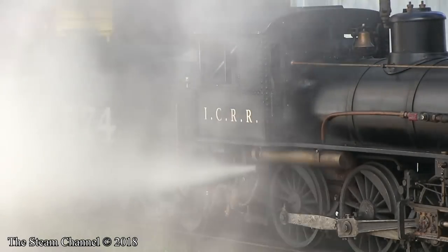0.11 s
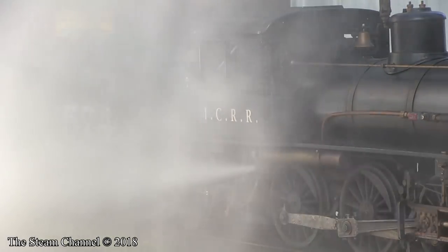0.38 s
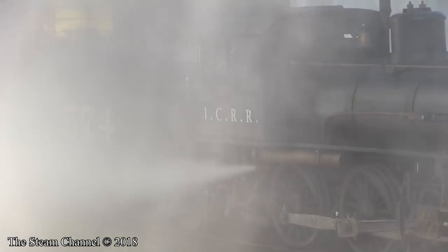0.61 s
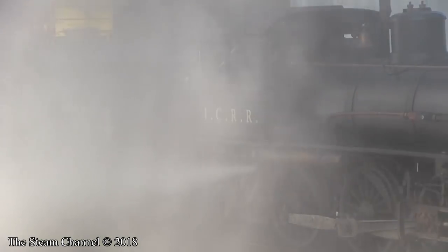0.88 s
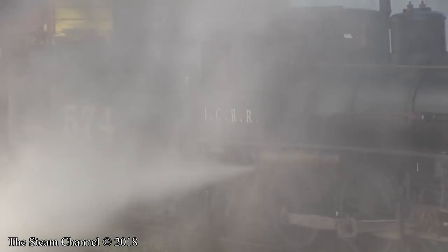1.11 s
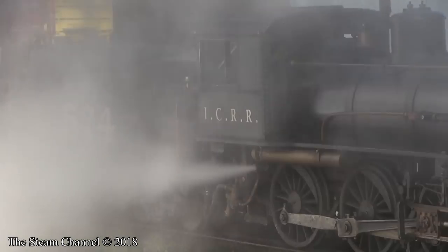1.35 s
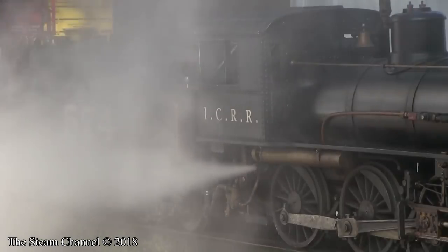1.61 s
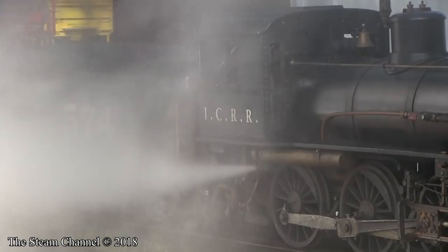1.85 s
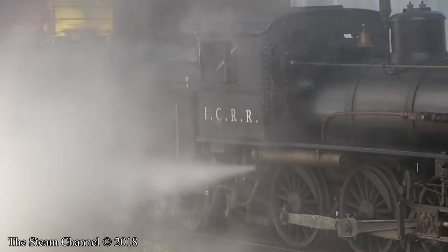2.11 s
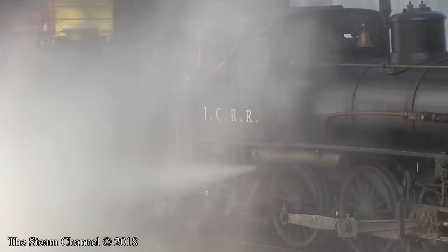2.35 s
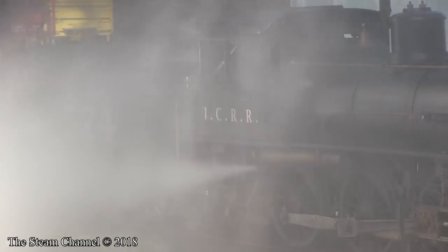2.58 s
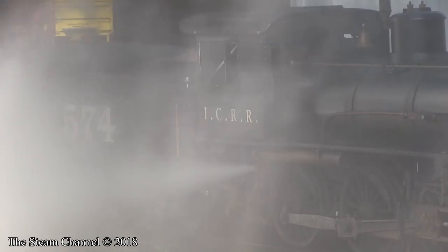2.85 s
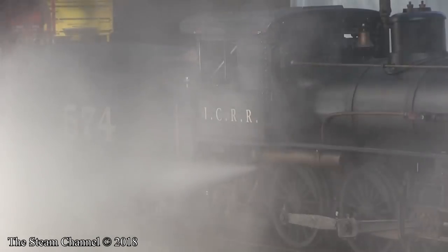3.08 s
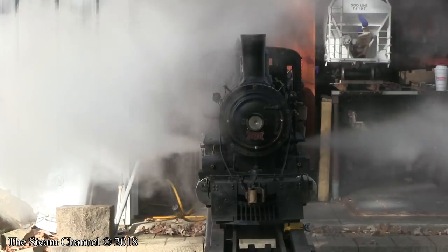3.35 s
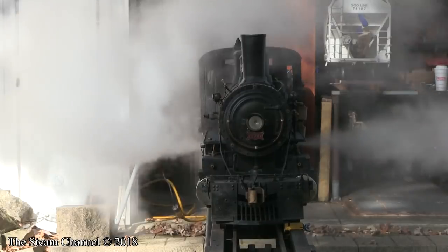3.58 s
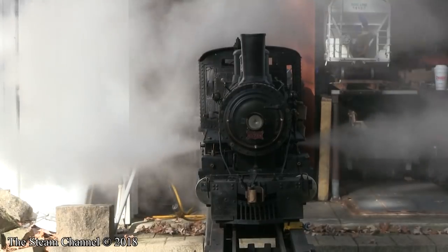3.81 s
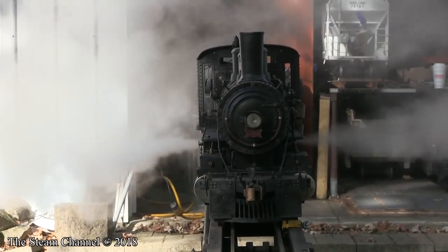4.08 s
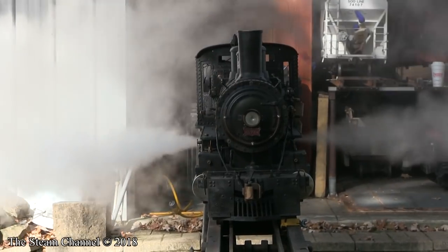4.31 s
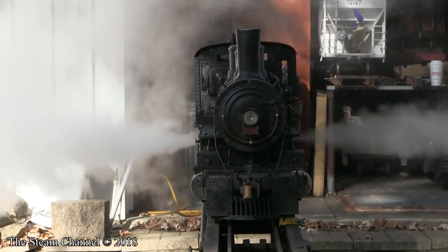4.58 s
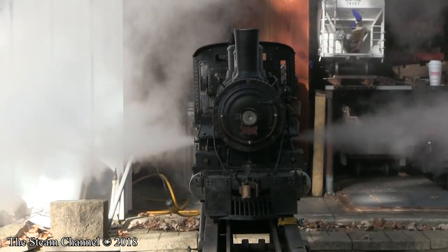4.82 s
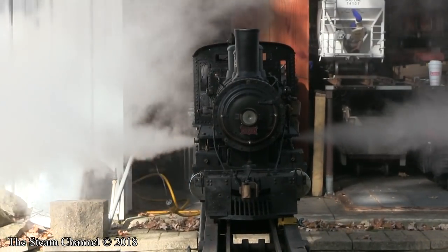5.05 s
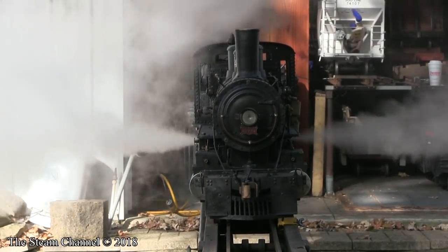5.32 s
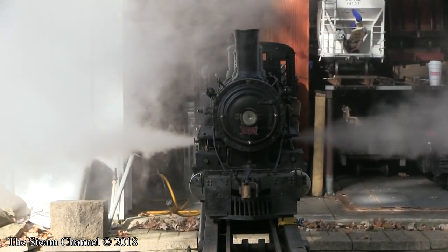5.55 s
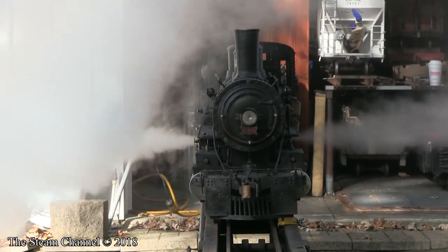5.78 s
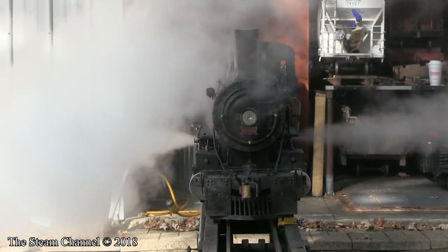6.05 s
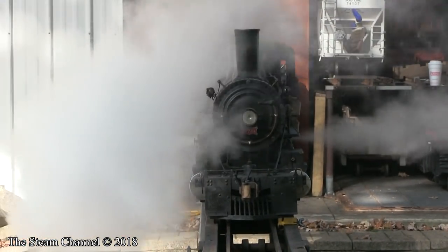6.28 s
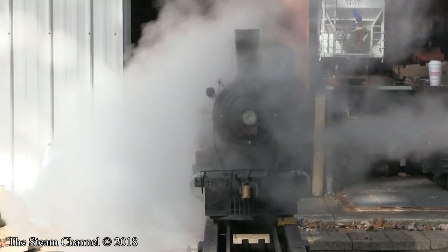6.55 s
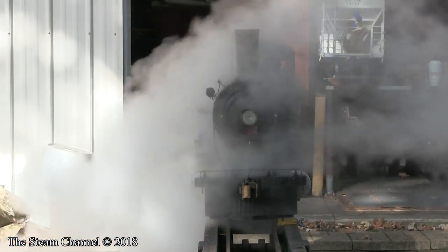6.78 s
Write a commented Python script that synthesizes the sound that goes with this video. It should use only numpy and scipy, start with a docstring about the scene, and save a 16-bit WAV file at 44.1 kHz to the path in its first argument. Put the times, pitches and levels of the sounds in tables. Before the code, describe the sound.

Outdoors in a yard, a close steam jet from a standing locomotive hisses loudly and continuously, with soft low air puffs thumping the microphone. Midway, a quick wet spit sounds and a breathy whistling tint passes through the hiss. The jet thins into a wider, quieter roar reflected by sheds, while a low motor spins up to a steady hum and light wind gusts rise near the end.

```python
"""A steam locomotive blows off in a yard: a close jet of shaped noise hisses over a wider roar thrown back by the sheds.
Ground and boiler reflections colour the jet with bands, and low-band puffs of air thump the microphone.
Near 3.8 s water spits in short noise bursts; a breathy whistle, a moving noise band, then passes through the jet.
Meanwhile the close hiss thins out and a motor, a sum of shaft orders over a rumble, speeds up to a nearly steady drone.
Soft gusts of low noise come and go, the strongest near the end."""
import sys
import numpy as np
from scipy import signal
from scipy.io import wavfile
from scipy.ndimage import uniform_filter1d

SR = 44100
rng = np.random.default_rng(int(sys.argv[2]) if len(sys.argv) > 2 else 0)


def transcribe(u):
    """Save the signal u as a 16-bit wav file named by the first command-line argument.

    u: samples, shape (n,) or (channels, n), limited to [-1, 1]; the rate is SR.
    q: integer samples, one column per channel.
    """
    v = np.clip(np.atleast_2d(u).T, -1, 1)
    q = np.round(v * 32767).astype(np.int16)
    wavfile.write(sys.argv[1], SR, q)


def attenuation_scalar(level_db):
    """Turn a level in dB into a linear amplitude multiplier (20 dB per decade)."""
    decades = np.asarray(level_db, float) / 20
    return 10 ** decades


N = 304731
HOP, SIZE = 256, 1024  # short-time spectrum, samples

# The blow-off and its share of close jet (0-1) as the plume drifts: start_s, hiss_db, close_share
PLUME = [(0, -15, 1), (.5, -15.5, 0.91), (1.25, -16, 1), (1.65, -13.5, 0.9), (1.95, -14.5, 0.96),
         (2.4, -16, 1), (2.85, -16.5, 0.99), (3.15, -15, 0.82), (3.6, -16, 0.77), (3.8, -15, 0.85),
         (4.2, -14.5, .8), (4.6, -16.5, 0.52), (4.95, -16, 0.26), (5.2, -18, 0.14), (5.8, -20.5, 0.15),
         (6.91, -20.5, 0.44)]
# Brief drops of the hiss: start_s, depth_db, length_s
LAPSES = [(0.313, 1.5, .06), (0.45, 2.2, 0.083), (1.286, 1.3, .115), (1.5, 0.6, 0.09), (1.746, 0.7, .078),
          (1.95, 1.4, 0.096), (2.542, 0.5, 0.12), (3.08, 2, 0.049), (3.24, 1.5, 0.13), (3.503, 0.3, .07),
          (3.813, 4, 0.11), (3.932, 2.5, 0.089), (4.134, 2.5, 0.087), (4.351, 0.2, 0.096), (4.65, 0, 0.056),
          (4.792, 0, .079)]
LAPSE_FALL_S, LAPSE_RETURN_S = 0.0081, 0.019
# Relative spectral density of the close jet: frequency_hz, density_db_per_hz
JET_COLOUR = [(120, -28), (250, -25.5), (500, -11), (1000, -10.5), (2000, -9.5), (3000, -5.5), (4600, -1),
              (6200, -7.5), (8600, -5.5), (10200, -11.5), (12500, -23), (15600, -32)]
# Scattered part of the jet against its direct part: frequency_hz, side_minus_mid_db
JET_WIDTH = [(200, -31), (1000, -10.5), (2500, -10), (5000, -11), (8000, -10.5), (12000, -8.5)]
# Reflections off boiler and wheels, before any blurring: centre_hz, width_hz, lift_db
JET_BANDS = [(805, 100, -8), (1360, 93, -16), (2070, 190, -1), (2240, 110, 1.5), (2500, 100, -5.5),
             (3370, 340, 2.5), (4250, 96, 4), (4200, 64, 0), (4610, 290, 1.5), (5080, 320, 3),
             (5270, 210, -6), (5650, 79, 6.5), (6120, 200, 0), (6430, 370, -1), (6910, 130, 6),
             (7420, 150, 4), (7600, 230, 1), (8700, 270, -0.5), (9200, 170, -2.5), (9960, 500, -3.5),
             (13100, 540, 7.5)]
# Breathy whistle in the jet; negative lift is a dip: time_s, centre_hz, lift_db
WHISTLE = [(3.9, 4850, -1), (4.15, 4900, 1), (4.4, 5250, 7), (4.55, 4830, 3), (4.75, 4600, 7.5),
           (5.05, 4730, 15), (5.35, 5050, 0), (5.6, 5050, -15)]
# Bands of the ground reflection at full strength:
# centre_hz, width_hz, sharp_lift_db, blurred_lift_db, slide_share (0-1)
GROUND_BANDS = [(611, 192, 5, 8, 0.89), (1098, 243, 7, 7, 0.25), (1634, 207, 14, 2, 1)]
# Ground path changing with the plume: time_s, slide_percent, blur (0-1), strength (0-1)
GROUND_PATH = [(0, 1, 0, 0.72), (.8, -0.5, 0.03, 0.88), (1.85, 1.5, 0.1, 1), (2.7, 1, 0.1, 0.98),
               (3.25, -6, 0.47, .95), (3.7, -1, 0.63, 1), (4.1, 3, 0.5, .98), (4.41, -18, 0.8, 0.88),
               (4.66, -7, 0.4, 1), (4.96, -9, 0.6, 0.45), (5.3, -11.5, 0.3, .75), (5.7, -6, .45, .8),
               (6.06, -9, 0.34, 0.74), (6.5, -7, .8, 1), (6.91, -10, .98, 0.7)]

# Relative spectral density of the roar: frequency_hz, density_db_per_hz
ROAR_COLOUR = [(25, -60), (60, -20), (150, -16.5), (300, -15.5), (550, -3.5), (800, -5.5), (1820, -7),
               (2700, -4), (3500, -6.5), (4800, -5), (7480, -8.5), (10800, -15), (15600, -26.5)]
# Scattered part of the roar, before the swing widens it: frequency_hz, side_minus_mid_db
ROAR_WIDTH = [(60, -21), (400, -14.5), (1000, -8.5), (2500, -8), (5000, -6), (9000, -7.5), (15000, -7)]
ROAR_DB, ROAR_LEAST_SHARE = -16, 0.23
ROAR_FOLLOWS = 0.37  # dB of roar per dB of hiss

# The plume swings left and back, and the roar widens meanwhile
SWING_S, SWING_LENGTH_S, SWING_DB, SWING_WIDENS_DB = 5.24, 0.7, 2, 3
SWING_US = 36  # greatest lead of the left port, microseconds, less in the treble
REST_PAN_DB, LATE_PAN_S, LATE_PAN_DB_PER_S = -.3, 6.6, -3  # left minus right

# Shaft orders relative to the drone: order (multiple of shaft rate), level_db
MOTOR_ORDERS = [(2, -19), (4, -28), (5, 1.5), (6, -3), (8, -9), (12, -11.5), (14, -11.5), (18, -9)]
# Relative spectral density of the motor's rumble: frequency_hz, density_db_per_hz
MOTOR_RUMBLE = [(25, -22), (45, -10), (90, -6.5), (200, -4), (330, -1.5), (500, -5), (900, -37)]
MOTOR_START_S, MOTOR_FADE_S, MOTOR_DB, RUMBLE_DB = 3.89, 0.67, -35.5, -33.5
MOTOR_SAG_DB_PER_S = 0.6  # from the spin-up on
SPIN_UP_S, SPIN_TIME_S = 4.22, .2
IDLE_HZ, RUN_HZ, CREEP_HZ_PER_S = 16, 19.8, .09  # shaft turns per second
STRAIN_S, STRAIN_LENGTH_S, STRAIN_DB = 4.63, 0.23, 1.5  # extra level as the shaft nears full speed
# The tenth order swells for a while
TENTH_DB, TENTH_ON_S, TENTH_OFF_S, TENTH_RISE_DB_PER_S, TENTH_FALL_DB_PER_S = -37, 4.98, 5.45, 20, 16

# Water spitting from the valve: start_s, nominal_db (6 dB above the onset rms), left_minus_right_db
SPITS = [(3.810, -11, 4), (3.816, -5, 5)]
# Puffs of air from the plume: middle_s, peak_db, length_s
PUFFS = [(.02, -39, 0.073), (.12, -40, 0.039), (.5, -44, .1), (.64, -45, 0.079), (.79, -35, 0.09),
         (.96, -35, 0.1), (1.11, -39, 0.083), (1.19, -48, .04), (1.31, -54, 0.037), (1.41, -39, 0.083),
         (1.68, -42, 0.14), (1.78, -42, 0.062), (1.87, -44, 0.087), (1.99, -33, 0.11), (2.15, -45, 0.086),
         (2.26, -36, 0.035), (2.52, -42, 0.032), (2.91, -34.5, 0.13), (3.01, -49.5, 0.032),
         (3.31, -34, 0.043), (3.45, -45, .12), (3.7, -39, 0.046), (3.8, -39, 0.057), (4.1, -37.5, 0.48)]
# Relative spectral density of the puffs: frequency_hz, density_db_per_hz
BUFFET_COLOUR = [(15, -63), (25, -35), (43, -30), (61, -14), (89, -1), (152, 14.5), (330, -1.5), (430, -35),
                 (730, -120)]
STIR_DB, STIR_SWING_DB, STIR_ENDS_S = -51, 6.5, 3.9  # weak random puffs between them
# Gusts of breeze: middle_s, peak_db, length_s
GUSTS = [(.55, -46, 0.55), (2.9, -48, 0.14), (3.3, -50, 0.3), (4.82, -45.5, 0.17), (5.2, -42, 0.62),
         (5.85, -38, 0.43), (6.8, -29.5, 0.22)]
# Relative spectral density of the breeze: frequency_hz, density_db_per_hz
BREEZE_COLOUR = [(25, -30), (60, -12), (100, 7), (170, 7), (260, -9), (450, -26), (900, -60)]


def jet(t):
    """Turbulent mixing: a close jet radiates broad noise that flutters as eddies tear off."""
    spectrum = noise(JET_COLOUR, lambda hz, s: read(JET_WIDTH, hz), patchy_db=1.1,
                     lift_db=jet_echoes, ridges_db=1.84, flicker_db=1.5)
    flutter_db = 0.21 * wander(t, low_hz=9, high_hz=60.4)
    return sound(*sideways(*spectrum)) * np.sqrt(closeness(t)) * attenuation_scalar(hiss_db(t) + flutter_db)


def jet_echoes(hz, t):
    """Interference: fixed reflections add or cancel, blurring as the plume shifts; a whistle passes."""
    sharpness = np.interp(t, [3.9, 4.6], [1, .5])
    bands = sharpness * sum(db * bump(hz, centre, width) for centre, width, db in JET_BANDS)
    whistle_hz, lift_db = curves(WHISTLE, t)
    passing = (t > WHISTLE[0][0]) & (t < WHISTLE[-1][0])
    return bands + ground(hz, t) + passing * lift_db * bump(hz, whistle_hz, width_hz=1100)


def ground(hz, t):
    """Interference: the ground echo lifts three bands; blurring moves the lift from the top to the lowest."""
    slide, blur, strength = curves(GROUND_PATH, t)
    lift_db = 0
    for centre_hz, width_hz, sharp_db, blurred_db, share in GROUND_BANDS:
        moved_hz = centre_hz * (1 + share * slide / 100)
        band_db = sharp_db + (blurred_db - sharp_db) * blur
        lift_db = lift_db + band_db * bump(hz, moved_hz, width_hz)
    return strength * lift_db


def hiss_db(t):
    """Source level: the blow-off varies slowly and lapses briefly."""
    def lapse(start_s, length_s):
        falling = (t - start_s) / LAPSE_FALL_S
        returning = (start_s + length_s - t) / LAPSE_RETURN_S + .5
        return np.clip(np.minimum(falling, returning), 0, 1)

    return curves(PLUME, t)[0] - sum(db * lapse(s, length) for s, db, length in LAPSES)


def closeness(t):
    """Energy sharing: the part of the hiss that stays a close jet."""
    return np.clip(curves(PLUME, t)[1], 0, 1)


def roar(t):
    """Diffuse reflection: the far plume and its echoes are wider and gain what the close jet loses."""
    def width_db(hz, s):
        return read(ROAR_WIDTH, hz) + SWING_WIDENS_DB * bump(s, SWING_S, SWING_LENGTH_S)

    spectrum = noise(ROAR_COLOUR, width_db, patchy_db=0.95,
                     lift_db=lambda hz, s: 0.8 * ground(hz, s), ridges_db=1.73, flicker_db=0.2)
    share = 1 - closeness(t) + ROAR_LEAST_SHARE
    level_db = hiss_db(t)
    follow_db = ROAR_FOLLOWS * (level_db - level_db.mean())
    return sound(*sideways(*spectrum)) * np.sqrt(share) * attenuation_scalar(ROAR_DB + follow_db)


def motor(t):
    """Harmonic excitation: wavering multiples of the shaft rate sound over a low rumble."""
    since = np.maximum(t - SPIN_UP_S, 0)
    shaft_hz = RUN_HZ + CREEP_HZ_PER_S * since - (RUN_HZ - IDLE_HZ) * np.exp(-since / SPIN_TIME_S)
    turns = np.cumsum(shaft_hz * (1 + 0.0011 * wander(t, low_hz=1.0, high_hz=5))) / SR

    def tone(order):
        waver = attenuation_scalar(0.89 * wander(t, low_hz=0.687, high_hz=4.2))
        return np.sqrt(2) * waver * np.sin(2 * np.pi * (order * turns + rng.random()))

    strain_db = STRAIN_DB * bump(t, STRAIN_S, STRAIN_LENGTH_S)
    orders = sum(attenuation_scalar(order_db) * tone(order) for order, order_db in MOTOR_ORDERS)
    drone = attenuation_scalar(MOTOR_DB - MOTOR_SAG_DB_PER_S * since + strain_db) * orders
    before_db = TENTH_RISE_DB_PER_S * np.maximum(TENTH_ON_S - t, 0)
    after_db = TENTH_FALL_DB_PER_S * np.maximum(t - TENTH_OFF_S, 0)
    tenth = attenuation_scalar(TENTH_DB - before_db - after_db) * tone(10)
    rumble = sound(*noise(MOTOR_RUMBLE, lambda hz, s: -12, patchy_db=3.0))
    rumble = attenuation_scalar(RUMBLE_DB) * rumble * np.clip((t - 4.0) / 0.77, 0, 1)
    fade = np.clip((t - MOTOR_START_S) / MOTOR_FADE_S, 0, 1)
    return fade * (drone + tenth + rumble)


def spits(t):
    """Impulsive radiation: short broad bursts decay exponentially, off to one side."""
    def burst(start_s, db, pan_db):
        sides_db = db + pan_db * np.array([[.5], [-.5]])
        return attenuation_scalar(sides_db) * (t >= start_s) * np.exp(-np.abs(t - start_s) / 0.0014)

    grain = signal.lfilter([1], [1, -.15], rng.standard_normal((2, N)))
    return sum(burst(*row) for row in SPITS) * grain / 2


def puffs(t):
    """Pressure buffeting: low puffs from the plume thump both ports nearly alike."""
    thump = sound(*noise(BUFFET_COLOUR, lambda hz, s: -13, patchy_db=0.0))
    stir = attenuation_scalar(STIR_DB + STIR_SWING_DB * wander(t, low_hz=1.9, high_hz=17))
    stir = stir * np.clip((STIR_ENDS_S - t) / 0.21, 0, 1)
    return thump * (swells(PUFFS, t) + stir)


def breeze(t):
    """Local turbulence: low wind noise differs strongly between the ports."""
    return sound(*noise(BREEZE_COLOUR, lambda hz, s: 3, patchy_db=1.0)) * swells(GUSTS, t)


def noise(colour, width_db, patchy_db, lift_db=lambda hz, t: 0, ridges_db=0, flicker_db=0):
    """Random superposition: a direct middle carries the echo colour, a scattered side carries less of it."""
    hz = np.fft.rfftfreq(SIZE, 1 / SR)[:, None]
    t = np.arange(N // HOP + 5) * HOP / SR
    a, b, c, d, patches, ridges = rng.standard_normal((len(t), len(hz), 6)).T
    patches = uniform_filter1d(patches, size=6, axis=0)
    patches = evened(uniform_filter1d(patches, size=24, axis=1))
    # many small echoes comb the direct part into thin, lasting ridges
    ridges = uniform_filter1d(ridges, size=2, axis=0)
    ridges = evened(uniform_filter1d(ridges, size=160, axis=1))
    middle = attenuation_scalar(read(colour, hz) + lift_db(hz, t) + ridges_db * ridges)
    side = attenuation_scalar(read(colour, hz) + width_db(hz, t) + 0.26 * lift_db(hz, t))
    # the flicker grows from none at 2.5 kHz to full at 10 kHz
    treble = np.clip(np.log2((hz + 1) / 2500) / 2, 0, 1)
    flicker = wander(t, low_hz=5.5, high_hz=25.97) * treble
    # each frame is levelled before patches and flicker act
    frame_rms = np.sqrt(np.mean(middle ** 2 + side ** 2, axis=0))
    gain = attenuation_scalar(patchy_db * patches + flicker_db * flicker) / frame_rms
    middle = middle * (a + 1j * b)
    side = side * (c + 1j * d)
    return hz, t, np.array([middle + side, middle - side]) * gain


def sideways(hz, t, spectrum):
    """Stereo localisation: a swing to the left makes the left port louder and earlier, less early in the treble."""
    swing = bump(t, SWING_S, SWING_LENGTH_S)
    pan_db = REST_PAN_DB + SWING_DB * swing + LATE_PAN_DB_PER_S * np.maximum(t - LATE_PAN_S, 0)
    lead_s = SWING_US * swing / 10 ** 6 * bump(hz, 0, width_hz=11000)
    turn = attenuation_scalar(pan_db / 2) * np.exp(1j * np.pi * hz * lead_s)  # half the lead on each port
    return hz, t, spectrum * np.array([turn, 1 / turn])


def sound(hz, t, spectrum):
    """Fourier synthesis: short-time spectra overlap into a wave of rms 1."""
    return evened(signal.istft(spectrum, nperseg=SIZE, noverlap=SIZE - HOP)[1][:, :N])


def swells(rows, t):
    """Superposed envelopes: rounded swells add in amplitude."""
    return sum(attenuation_scalar(db) * bump(t, s, length) for s, db, length in rows)


def wander(t, low_hz, high_hz):
    """Superposed slow sines of random phase: an irregular drift of rms 1."""
    return evened(sum(np.sin(2 * np.pi * (f * t + rng.random())) for f in np.geomspace(low_hz, high_hz, 40)))


def bump(x, centre, width_hz):
    """Gaussian resonance shape: height 1, full width at half height, in the unit of x."""
    return np.exp(-np.log(16) * ((x - centre) / width_hz) ** 2)


def read(points, hz):
    """Spectral interpolation on a logarithmic frequency axis."""
    f, value = np.transpose(points)
    return np.interp(np.log(hz + 1), np.log(f + 1), value)


def curves(rows, t):
    """Linear interpolation of every column of a table at the times t."""
    s, *columns = np.transpose(rows)
    return [np.interp(t, s, column) for column in columns]


def evened(x):
    """Energy normalisation: scales to rms 1."""
    return x / np.sqrt(np.mean(x ** 2) + 1e-20)


def scene():
    """Linear superposition of all sources at the microphone."""
    t = np.arange(N) / SR
    return jet(t) + roar(t) + motor(t) + spits(t) + puffs(t) + breeze(t)


def top_cut(x):
    """Nothing passes above the cut-off."""
    return signal.sosfilt(signal.butter(12, 15700, fs=SR, output="sos"), x)


def record(dry):
    """High-pass response: the microphone rolls off the lowest bass."""
    rolloff = signal.butter(2, 45, "high", fs=SR, output="sos")
    mix = signal.sosfilt(rolloff, dry)
    return top_cut(mix)


dry = scene()
out = record(dry)
transcribe(out)
```